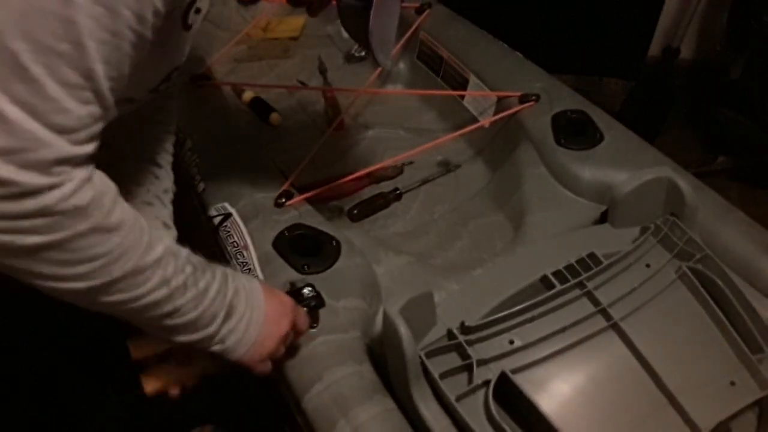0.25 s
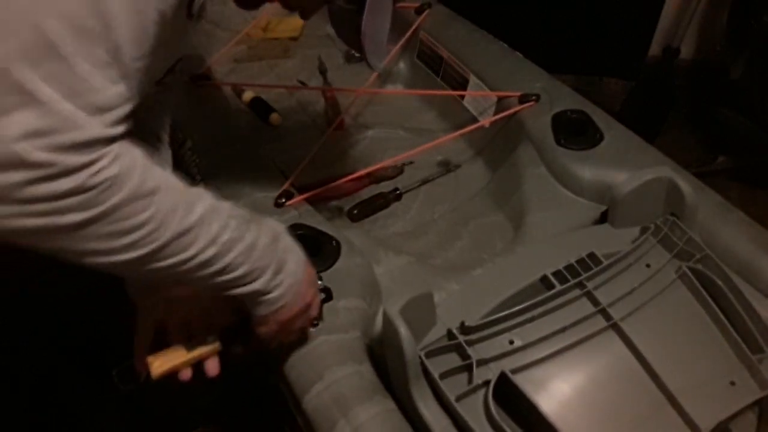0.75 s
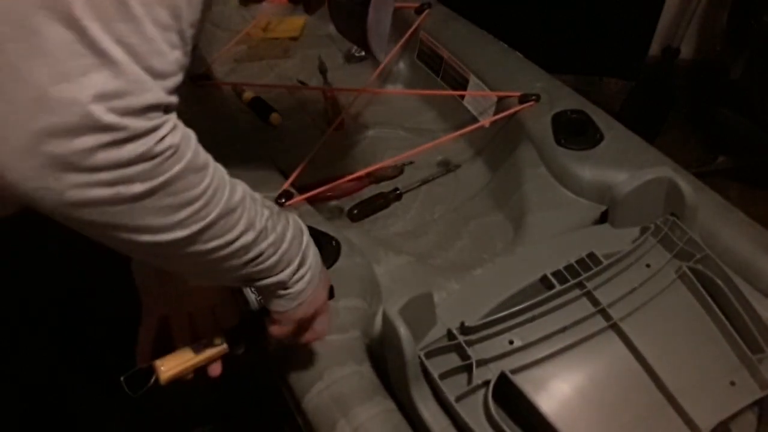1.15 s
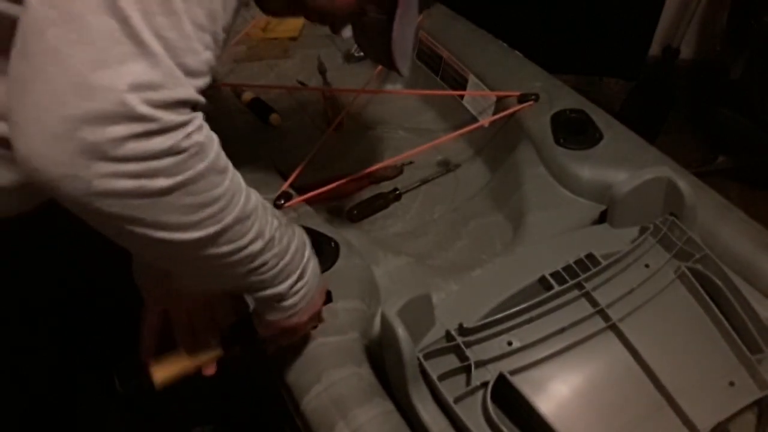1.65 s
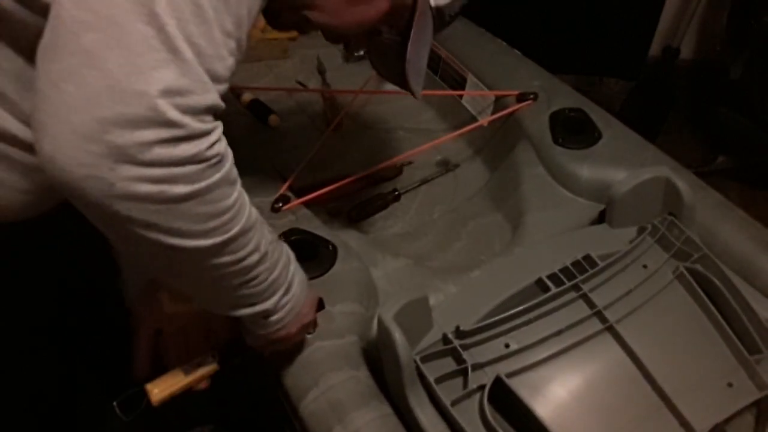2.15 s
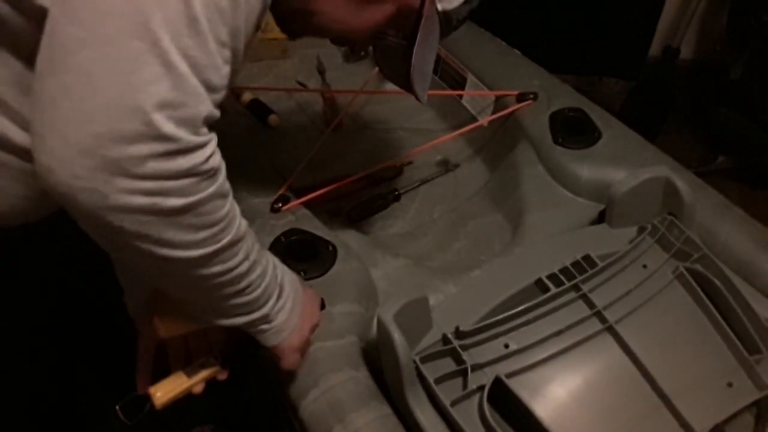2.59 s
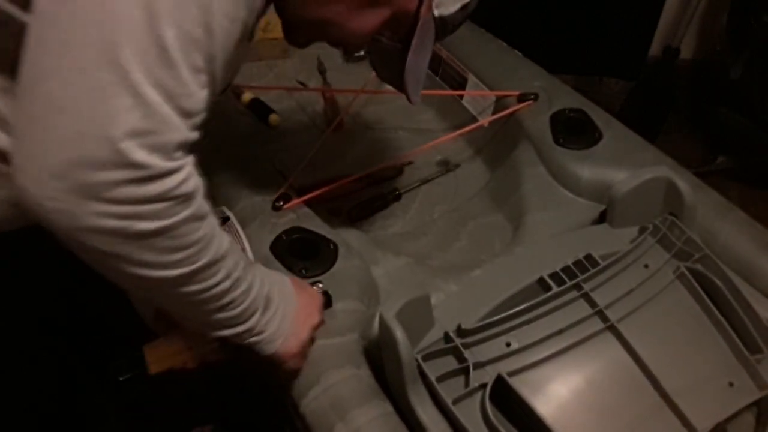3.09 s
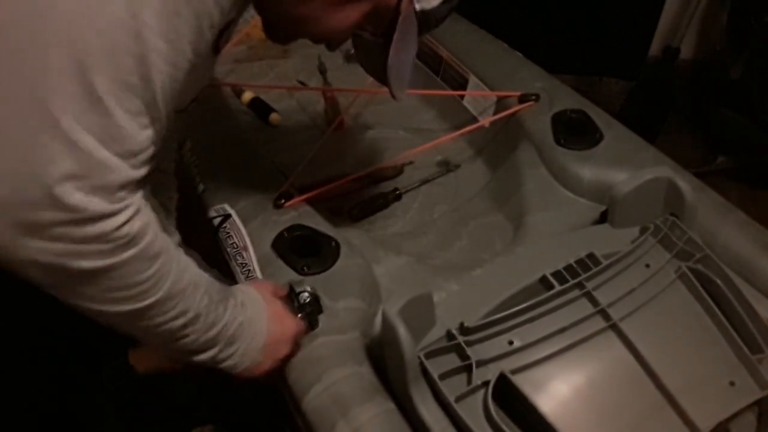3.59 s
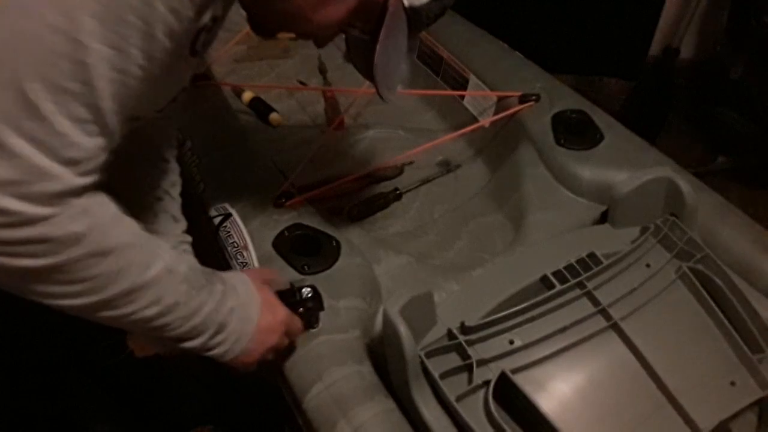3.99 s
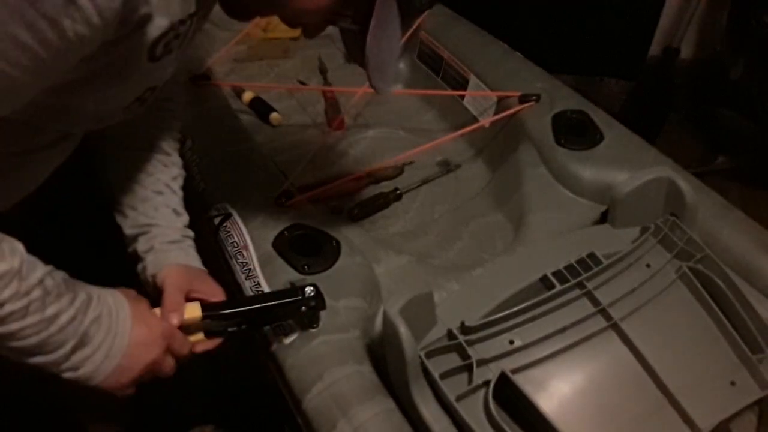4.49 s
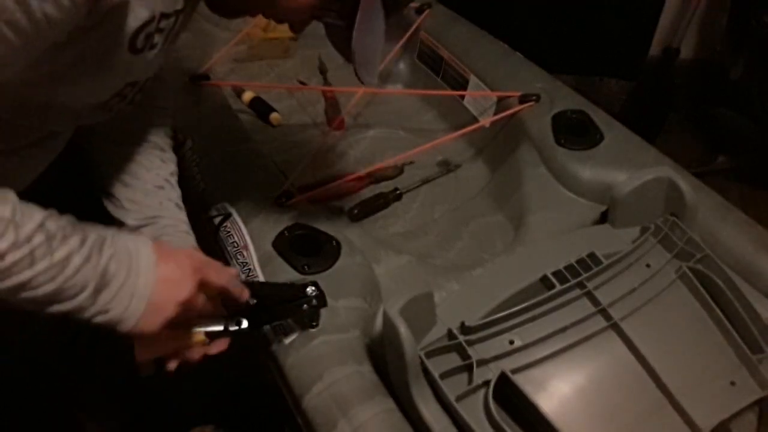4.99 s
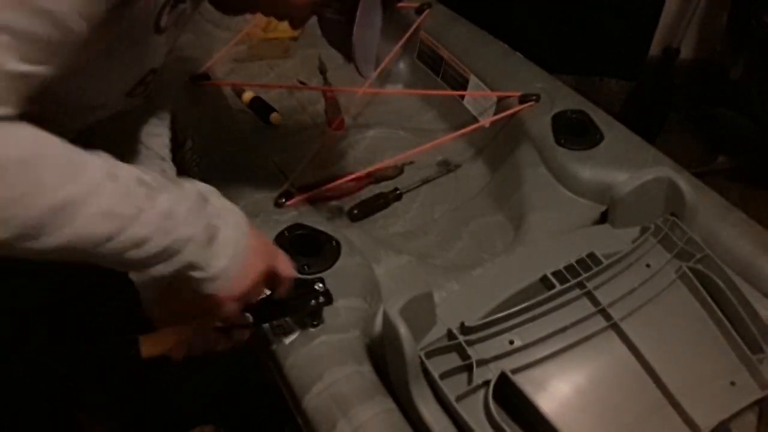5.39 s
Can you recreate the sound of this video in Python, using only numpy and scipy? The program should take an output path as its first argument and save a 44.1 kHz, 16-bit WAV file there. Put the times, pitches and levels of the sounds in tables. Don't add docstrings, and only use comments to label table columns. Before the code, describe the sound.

A hand rivet gun clicks and bangs in a fast clattering burst on a hollow plastic hull, then a steel stem drops and rings on the floor.

```python
import sys
import numpy as np
from scipy import signal
from scipy.fft import rfft, irfft, next_fast_len
from scipy.io import wavfile
from scipy.ndimage import map_coordinates

SR = 44100
rng = np.random.default_rng(int(sys.argv[2]) if len(sys.argv) > 2 else 0)


def dump(signal):
    limited = np.clip(np.atleast_2d(signal).T, -1, 1)
    pcm = np.round(limited * 32767).astype(np.int16)
    wavfile.write(sys.argv[1], SR, pcm)


def voltage_ratio(decibels):
    exponent = np.asarray(decibels, float) / 20
    return 10 ** exponent


N = 249165
AFTER = np.arange(SR * 3 // 8) / SR
SCATTER_DB = 1.5
TURN_S, REST_S = 3.07, 3.31

# freq_hz, density_db
ROOM_TONE = [(18, -60), (40, -5), (100, -3.5), (200, -5.5), (370, -4.5), (600, -9.5), (900, -17.5),
             (1600, -21.5), (2400, -34), (6000, -46.5), (12000, -120)]
# freq_hz, correlation
LIKENESS = [(60, 0.67), (130, 0.98), (290, 0.8), (640, 0.34), (1400, 0.014)]
# freq_hz, t60_s
ROOM_DECAY = [(100, 0.31), (500, 0.35), (2000, 0.37), (6000, 0.35), (14000, 0.36)]
# freq_hz, gain_db
PORT_SHADOW = [(60, 1), (400, -4), (700, -1.5), (1300, -12.5), (2400, -10.5), (4400, -35), (6500, -68),
               (8000, -71), (12500, -42), (13500, -28), (14500, -36)]
# freq_hz, level_db
HISS_LEFT = [(1000, -120), (2500, -8), (6500, -7), (7800, 5.5), (11000, 2), (12500, -10), (13800, 9),
             (16000, -18.5)]
# freq_hz, level_db
HISS_RIGHT = [(1000, -120), (2500, 1), (6500, -6), (9000, -9), (12000, -2), (14000, 2), (16000, -10.5)]
# time_s, buffeting_db
STIR = [(0.0, -60), (0.12, -52), (0.3, -55), (0.7, -50), (1.16, -49), (1.64, -49.5), (1.95, -48),
        (2.3, -54), (2.65, -46.5), (3.0, -48), (3.2, -55), (3.7, -58), (3.95, -52), (4.2, -57), (4.81, -59),
        (5.13, -49), (5.4, -54), (5.65, -46)]
# freq_hz, level_db
GUST = [(15, -25), (40, -8.5), (100, 7), (170, -8.5), (300, -19.5), (600, -47.5), (1500, -120)]
# start_s, peak_db, pitch_hz
PUFFS_LEFT = [(0.118, -18.5, 207), (0.129, -21, 200), (0.15, -26.5, 198), (0.4, -26.5, 135),
              (0.84, -23.5, 220), (1.094, -27.5, 162), (1.13, -26.5, 100), (1.445, -28, 161),
              (1.531, -27, 130), (1.596, -19, 193), (1.611, -25, 180), (2.102, -29, 141),
              (2.456, -21.5, 144), (2.502, -15.5, 137), (2.527, -27.5, 160), (2.542, -25.5, 232),
              (2.566, -21, 179), (2.713, -30, 130), (2.747, -28.5, 129), (2.851, -24, 255),
              (2.969, -27, 157), (2.984, -25.5, 140), (3.315, -22, 142), (4.032, -25.5, 178),
              (4.05, -27, 178), (4.593, -28, 158), (4.603, -26.5, 159), (5.003, -27.5, 142),
              (5.031, -30, 200), (5.455, -20.5, 161)]
# start_s, peak_db, pitch_hz
PUFFS_RIGHT = [(0.24, -32, 110), (0.42, -34, 111), (0.531, -33, 140), (0.639, -33.5, 100), (0.825, -33, 99),
               (0.853, -28, 142), (0.866, -27.5, 140), (1.316, -33, 157), (2.964, -32, 139),
               (3.54, -26, 129), (4.006, -31.5, 130), (4.376, -30.5, 109), (5.177, -30.5, 130),
               (5.547, -29, 140)]
EDDIES_PER_S = [14, 7]
# start_s, length_s, level_db
SLEEVE_MOVES = [
    (.06, .12, -70),
    (.65, .1, -71),
    (1.2, .43, -70.5),
    (2.46, .48, -70.5),
    (3.38, .12, -75),
]
# freq_hz, level_db
CLOTH = [(3000, -120), (5000, -37), (7500, -6.5), (9000, 0.5), (11500, 0), (14000, -12.5), (16000, -15)]
# start_s, length_s, center_hz, width_hz, level_db
SCUFFS = [
    (0.11, 0.047, 456, 400, -51.5),
    (0.129, 0.063, 1800, 1400, -70),
    (1.596, 0.088, 3520, 1500, -71.5),
    (2.329, .09, 1980, 900, -70),
    (2.438, 0.083, 1010, 700, -60),
    (2.824, 0.21, 2970, 900, -68.5),
    (4.009, 0.045, 5060, 1300, -66.5),
    (4.013, 0.036, 8500, 900, -64.5),
    (5.27, .015, 4200, 1400, -69),
]
# start_s, crack_db, ring_db
LANDINGS = [
    (3.0074, -25.5, -40.5),
    (3.021, -32, -42.5),
    (3.039, -44, -61),
    (3.048, -51, -55),
    (3.0922, -29.5, -39),
    (3.154, -35.5, -50),
]
# freq_hz, before_turn_db, after_turn_db, t60_s
STEM_MODES = [(2370, -14, -15, .12), (4180, -17, -10, .15), (5892, -15, -1.5, .4), (5966, -21, -10, .25),
              (8562, -20, -16, .25), (9868, -3.5, -13, .36), (12020, -27, -7, .14), (13485, -5, -1.5, .14),
              (15490, -26, -20, .08)]
# freq_hz, level_db
TAP = [(500, -16.5), (1000, 5.5), (1600, -0.5), (2600, -1.5), (4500, -9), (8000, -10.5), (11000, -16.5),
       (14000, -20.5), (16000, -17.5)]
# start_s, handle_db, lever_db, jaw_db, pin_db
CLICKS = [(0.136, -69, -53, -68, -68), (0.4645, -64, -75, -83, -56.5), (1.0475, -48, -46.5, -45.5, -40.5),
          (1.3124, -64, -63, -79, -57), (2.3426, -72, -54, -80, -79), (2.365, -58, -64, -74, -79),
          (2.4656, -75, -50, -80, -80), (2.8943, -68, -38.5, -47, -57), (2.9117, -68, -39, -49.5, -64),
          (4.37, -64, -51, -76, -79), (4.7977, -43, -45, -49, -54), (4.9118, -60, -63, -62.5, -76),
          (5.0633, -70, -57, -82, -78)]
# freq_hz, level_db, t60_s
PART_MODES = [
    [(2038, -4, .14), (2066, -.5, .14), (2210, -14, .035)],
    [(1450, -4, .035), (1605, -4, .045), (1200, -10, .02)],
    [(2720, -10, .03), (3000, -4, .05), (3150, -7, .03), (4050, -9, .05)],
    [(5030, -11, .025), (5820, -12, .025), (7110, -5, .035), (7410, -3, .045), (7680, -8, .025),
     (12600, -13, .03)],
]
# center_hz, width_hz
PART_BANDS = [
    (2060, 230),
    (1410, 1070),
    (2970, 1500),
    (6520, 3800),
]
# handle_db, lever_db, jaw_db, pin_db
RING_OVER_RATTLE = [-6, -14, -12, -7]
# start_s, crack_db, boom_db, hardness_db_per_octave
BLOWS = [(1.663, -40.5, -26, -2.5), (1.692, -19, -17.5, -0.5), (1.701, -17.5, -20, 3.5),
         (1.710, -19.5, -20, 2.5), (1.719, -25.5, -16.5, 1), (1.727, -34, -21, -1.5),
         (1.735, -17, -24.5, 5.5), (1.746, -20.5, -26, 3.5), (1.766, -42, -28.5, 3),
         (2.898, -43, -44, -9.5), (2.926, -53, -46.5, 0), (0.137, -57, -46.5, 1)]
# freq_hz, level_db, t60_s
HULL_MODES = [(94.4, -19.5, .12), (128.3, -6.5, 0.19), (149.3, -15.5, 0.39), (217.3, -4.5, 0.15),
              (259.5, -3.5, 0.1), (306, -4.5, 0.13), (344, 1, .09), (396, 1.5, 0.09), (414, -5.5, 0.11),
              (459, -8.5, 0.065), (520.2, -0.5, 0.16), (557, -7.5, 0.072), (625, -17.5, 0.077),
              (650, -8, .08), (746, -13.5, 0.12), (816, -23.5, 0.077), (977, -19.5, 0.16), (1182, -18, 0.1),
              (1527, -9.5, 0.035), (1700, -24, 0.14), (1957, -14.5, 0.048), (2250, -32, .05)]
# freq_hz, level_db
SKIN = [(200, -31.5), (500, -3), (900, -2), (1500, 0), (2500, -7), (3300, -6.5), (4200, -13.5), (9000, -25),
        (13000, -36.5), (16000, -29)]


def along(points, hz):
    f, v = np.transpose(points)
    return np.interp(np.log(hz + 1), np.log(f + 1), v)


def filtered(x, response):
    n = x.shape[-1]
    m = next_fast_len(n + 4096)
    spectrum = rfft(x, m) * response(np.fft.rfftfreq(m, 1 / SR))
    return irfft(spectrum, m)[..., :n]


def unit(x):
    return x / np.sqrt(np.mean(x ** 2, axis=-1, keepdims=True) + 1e-20)


def wobble(rate_hz):
    knots = rng.standard_normal(int(N * rate_hz / SR) + 4)
    return map_coordinates(knots, [np.arange(N) * rate_hz / SR])


def noise(spectrum, size=N, channels=2):
    white = rng.standard_normal((channels, size))
    return unit(filtered(white, lambda hz: voltage_ratio(along(spectrum, hz))))


def band(hz, width_hz):
    width = min(width_hz, 0.85 * hz)
    return [(hz / 4, -55), (hz - width * 0.8, -16), (hz - width / 2, -4), (hz, 0),
            (hz + width / 2, -4), (hz + width * 0.9, -17), (hz * 2.5, -45)]


def alike(pair):
    def mid_side(hz):
        turn = np.arccos(np.clip(along(LIKENESS, hz), -1, 1)) / 2
        return np.array([np.cos(turn), np.sin(turn)])

    mid, side = filtered(pair, mid_side)
    return np.array([mid + side, mid - side])


def in_room(hit, wet_db, far_db):
    hz, t, z = signal.stft(rng.standard_normal((2, len(hit))), SR, nperseg=256)
    decay = voltage_ratio(-60 * t / along(ROOM_DECAY, hz)[:, None])
    tail = signal.istft(z * decay, SR, nperseg=256)[1][:, :len(hit)]
    buildup = 1 - np.exp(-np.arange(len(hit)) / SR / 0.0038)
    tail = alike(tail * buildup)
    wet = signal.fftconvolve(hit[None], tail / np.linalg.norm(tail[0]), axes=1)[:, :len(hit)]
    return hit * voltage_ratio([[0], [far_db]]) + voltage_ratio(wet_db) * wet


def add(out, start_s, hit):
    part = out[:, round(start_s * SR):][:, :hit.shape[1]]
    part += hit[:, :part.shape[1]]


def ring(modes, flutter=0):
    hz, db, t60_s = np.transpose(modes)[:, :, None]
    sign, scatter, rate, phase = rng.standard_normal((4, len(modes), 1))
    turning = 1 + flutter * np.cos(2 * np.pi * (9 + 3 * rate) * AFTER + phase)
    decay = voltage_ratio(db + SCATTER_DB * scatter - 60 * AFTER / t60_s)
    return np.sum(turning * np.sign(sign) * decay * np.sin(2 * np.pi * hz * AFTER), axis=0)


def crack(spectrum, t60_s, size=2048):
    push = 0.51 * rng.standard_normal(size) * voltage_ratio(-60 * AFTER[:size] / t60_s)
    push[0] += 3
    cepstrum = irfft(np.log(voltage_ratio(along(spectrum, np.fft.rfftfreq(size, 1 / SR)))))
    cepstrum[1:size // 2] *= 2
    cepstrum[size // 2 + 1:] = 0
    burst = irfft(rfft(push) * np.exp(rfft(cepstrum)))
    return np.pad(6.62 * burst / np.linalg.norm(burst), (0, len(AFTER) - size))


def sensor_hiss():
    left = voltage_ratio(-70.5) * noise(HISS_LEFT, channels=1)[0]
    right = voltage_ratio(-75.5) * noise(HISS_RIGHT, channels=1)[0]
    return np.array([left, right])


def room_tone(stir_db):
    level_db = -51 + 0.15 * (stir_db - stir_db.mean()) + 0.53 * wobble(12)
    return voltage_ratio(level_db) * unit(alike(noise(ROOM_TONE)))


def buffeting(stir_db):
    fast = np.array([wobble(30), wobble(30)])
    slow = np.array([wobble(6.34), wobble(5.73)])
    lumps = voltage_ratio(3 * fast + 1.6 * slow)
    return voltage_ratio(stir_db + np.array([[1.5], [0.3]])) * unit(lumps * noise(GUST))


def eddies(rate_hz, over_db, stir_db):
    slots = np.arange(1, int(N / SR * rate_hz) - 1)
    start_s = (slots + rng.random(len(slots))) / rate_hz
    size, pitch = rng.standard_normal((2, len(slots)))
    peak_db = stir_db[(start_s * SR).astype(int)] + over_db + 2.5 * size
    return list(zip(start_s, peak_db, 145 * 2 ** (0.35 * pitch)))


def puffs(table):
    out = np.zeros(N)
    t = np.arange(-2000, 2000) / SR
    for start_s, db, hz in table:
        attack = np.exp(-0.5 * (t * hz / 0.28) ** 2)
        release = 1 / np.cosh(t * hz / 0.62)
        shape = np.where(t < 0, attack, release)
        sway = hz * t / np.sqrt(1 + np.maximum(t, 0) * hz * 0.78)
        push = voltage_ratio(db) * shape * np.cos(2 * np.pi * sway + rng.uniform(0, 2 * np.pi))
        out[round((start_s - 0.0015) * SR) - 2000:][:len(t)] += push
    return out


def air_on_ports(stir_db):
    left = puffs(PUFFS_LEFT + eddies(EDDIES_PER_S[0], 13, stir_db))
    right = puffs(PUFFS_RIGHT + eddies(EDDIES_PER_S[1], 12, stir_db))
    return buffeting(stir_db) + np.array([left, right])


def sleeves():
    t = np.arange(N) / SR
    moves = voltage_ratio(-83)
    for start_s, length_s, db in SLEEVE_MOVES:
        edge_s = np.minimum(t - start_s, start_s + length_s - t)
        moves = moves + voltage_ratio(db) * np.clip(edge_s / 0.04, 0, 1)
    return moves * voltage_ratio(0.68 * wobble(25) + 1.5) * noise(CLOTH)


def scuffs():
    out = np.zeros((2, N))
    for start_s, length_s, hz, width_hz, db in SCUFFS:
        stroke = np.sin(np.pi * np.clip(AFTER / length_s, 0, 1) ** 0.52)
        slide = noise(band(hz, width_hz), size=len(AFTER), channels=1)[0]
        add(out, start_s, in_room(voltage_ratio(db) * stroke * slide, wet_db=-2.5, far_db=-17))
    return out


def stem():
    out = np.zeros((2, N))
    for start_s, crack_db, ring_db in LANDINGS:
        modes = [(hz, before if start_s < TURN_S else after, t60_s)
                 for hz, before, after, t60_s in STEM_MODES]
        tap = voltage_ratio(crack_db) * crack(TAP, t60_s=0.023)
        add(out, start_s, in_room(tap, wet_db=4.5, far_db=3))
        stop = np.clip((REST_S - start_s - AFTER) / 0.08, 0, 1)
        tone = voltage_ratio(ring_db + 0.5) * ring(modes, flutter=0.62) * stop
        add(out, start_s, in_room(tone, wet_db=-1.5, far_db=-13))
    return out


def gun():
    out = np.zeros((2, N))
    for start_s, *levels_db in CLICKS:
        rattle, rings = np.zeros((2, len(AFTER)))
        for db, ring_db, modes, part in zip(levels_db, RING_OVER_RATTLE, PART_MODES, PART_BANDS):
            rattle = rattle + voltage_ratio(db + 1.5) * crack(band(*part), t60_s=0.013)
            rings = rings + voltage_ratio(db + ring_db + 7) * ring(modes)
        add(out, start_s, in_room(rattle, wet_db=5, far_db=-7))
        add(out, start_s, in_room(rings, wet_db=-2.5, far_db=1))
    return out


def hull():
    out = np.zeros((2, N))
    for start_s, crack_db, boom_db, tilt_db in BLOWS:
        modes = [(hz, db + tilt_db * np.log2(hz / 400), t60_s) for hz, db, t60_s in HULL_MODES]
        boom = ring(modes) * (1 - np.exp(-AFTER / 0.0013))
        blow = voltage_ratio(crack_db) * crack(SKIN, t60_s=0.021) + voltage_ratio(boom_db) * boom
        add(out, start_s, in_room(blow, wet_db=2, far_db=-2))
    return out


def scene():
    time_s, level_db = np.transpose(STIR)
    stir_db = np.interp(np.arange(N) / SR, time_s, level_db)
    left, right = room_tone(stir_db) + sleeves() + scuffs() + stem() + gun() + hull()
    right = filtered(right, lambda hz: voltage_ratio(along(PORT_SHADOW, hz)))
    return air_on_ports(stir_db) + np.array([left, right])


def low_pass(x):
    return signal.sosfilt(signal.butter(12, 16640, fs=SR, output="sos"), x)


def record(dry):
    rolled_off = filtered(dry, lambda hz: (1j * hz / (1j * hz + 45)) ** 2)
    mix = filtered(rolled_off + sensor_hiss(), lambda hz: hz < 15830)
    return low_pass(mix)


dry = scene()
out = record(dry)
dump(out)
```